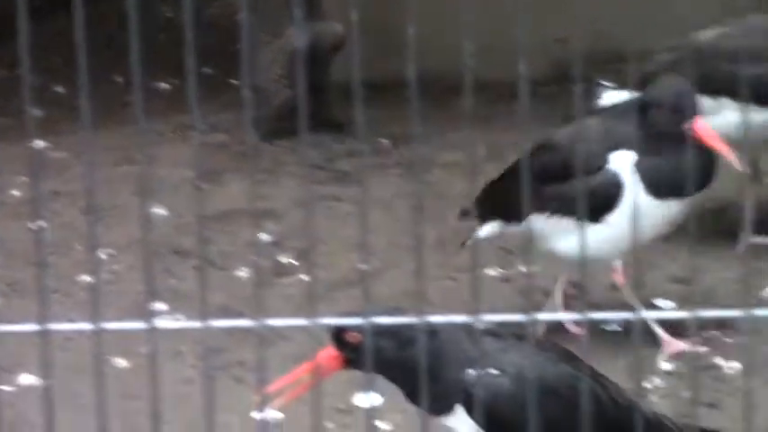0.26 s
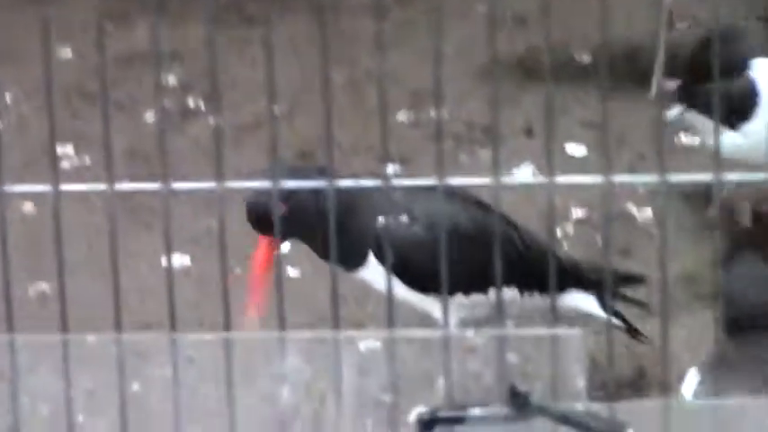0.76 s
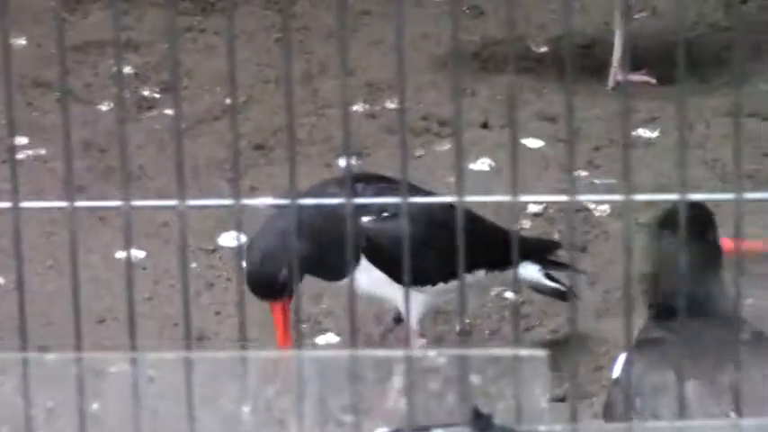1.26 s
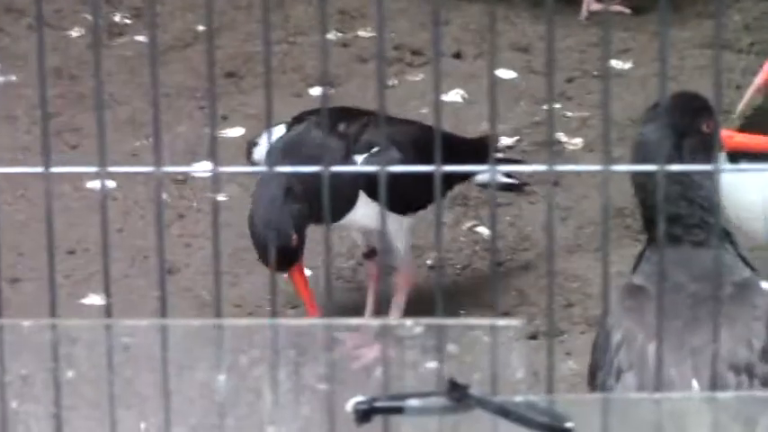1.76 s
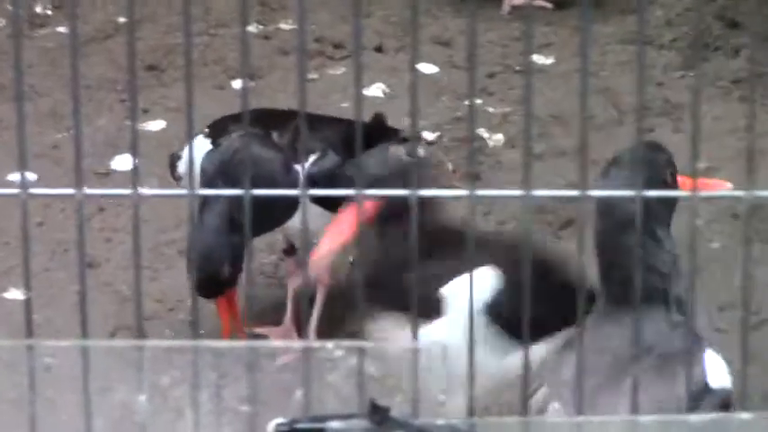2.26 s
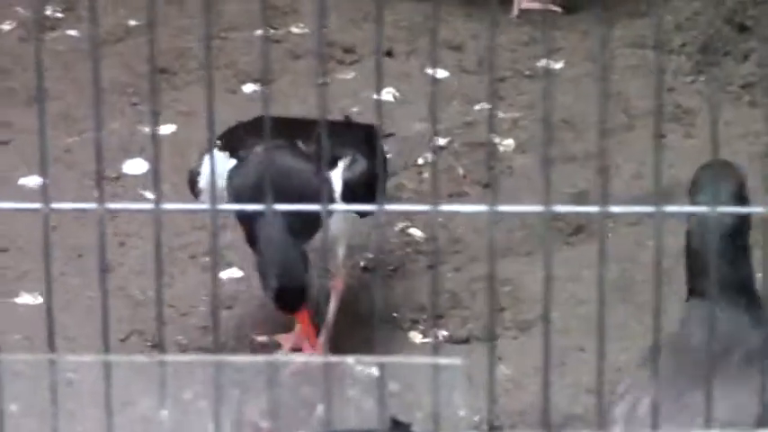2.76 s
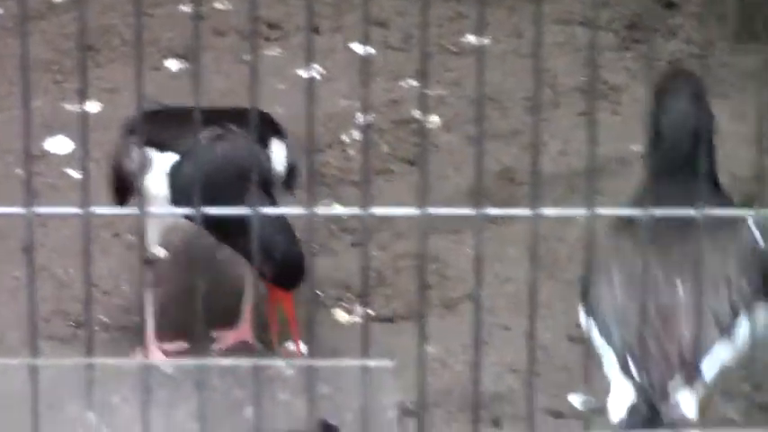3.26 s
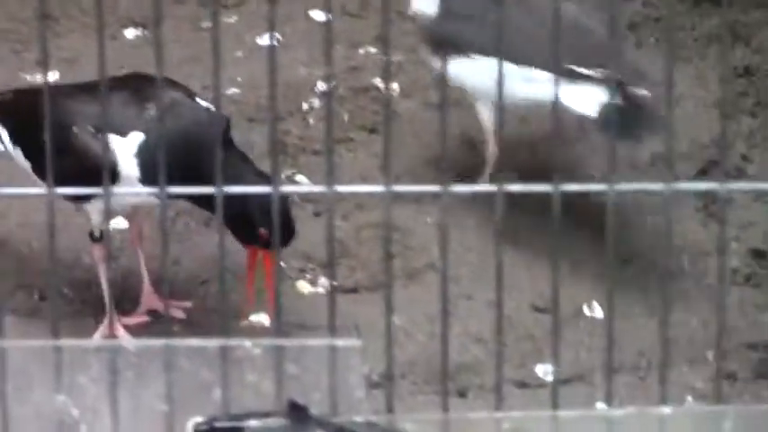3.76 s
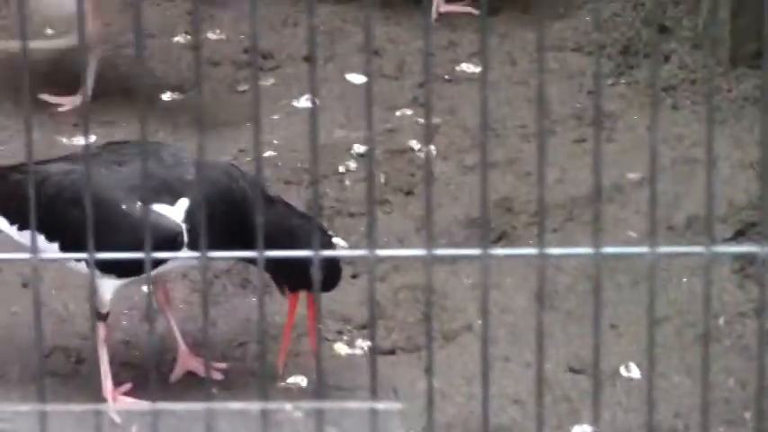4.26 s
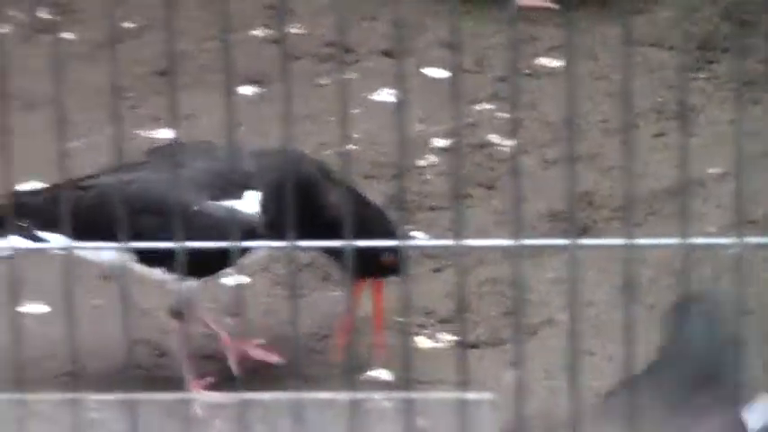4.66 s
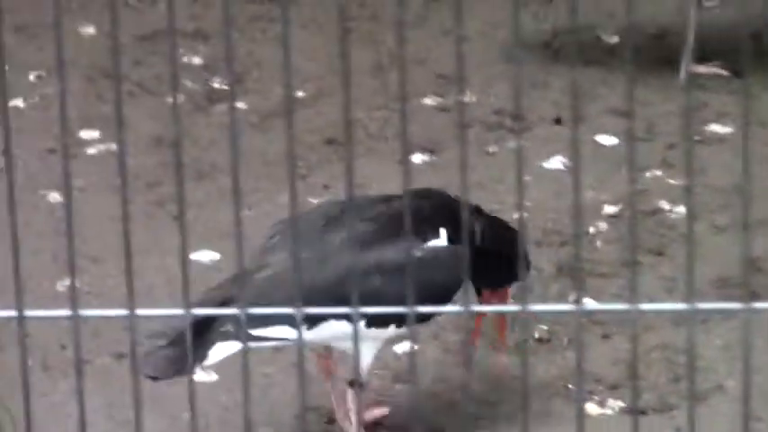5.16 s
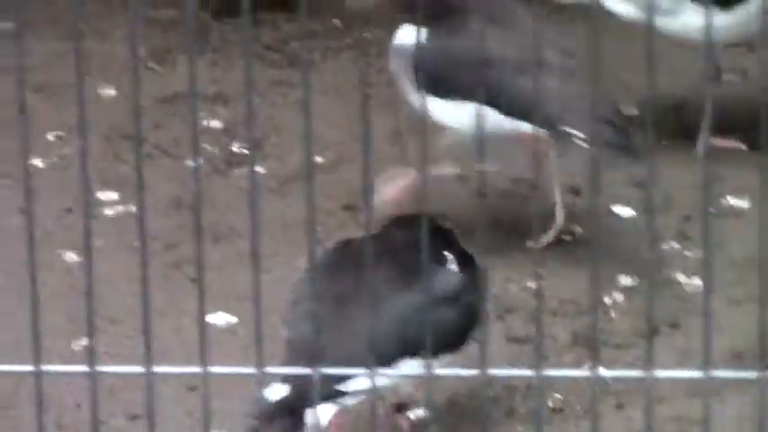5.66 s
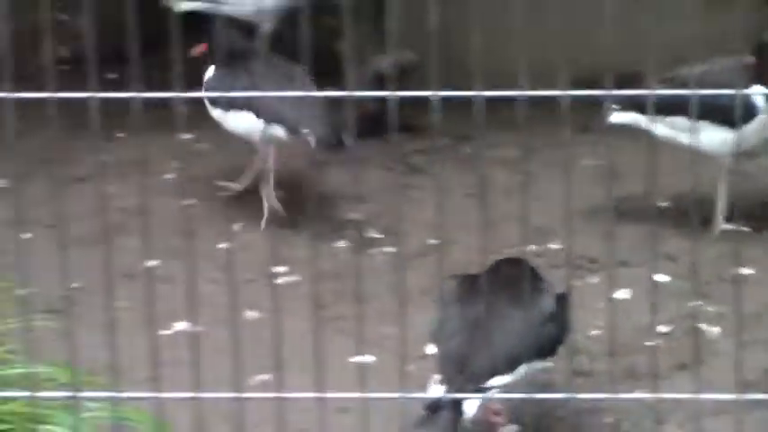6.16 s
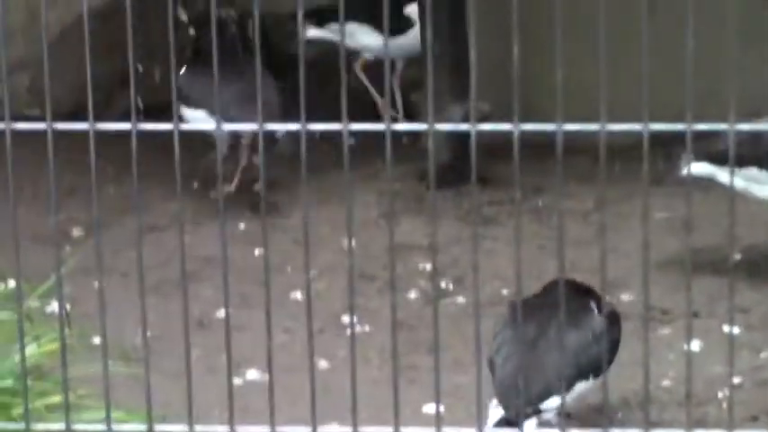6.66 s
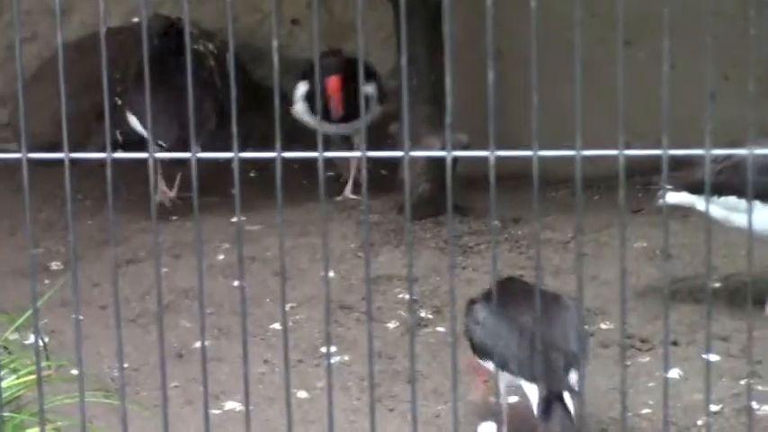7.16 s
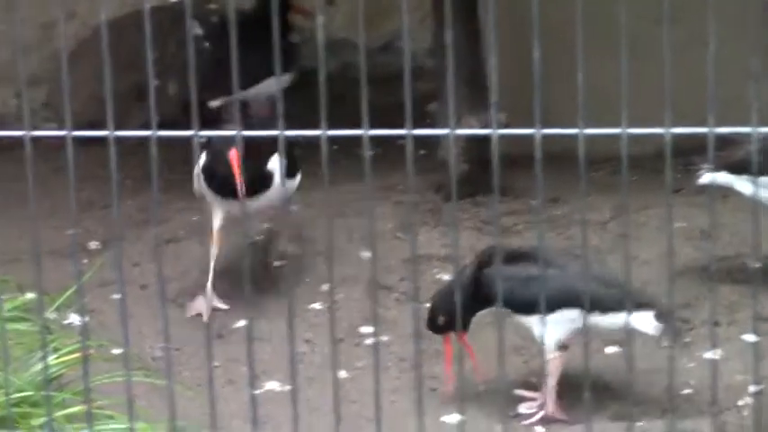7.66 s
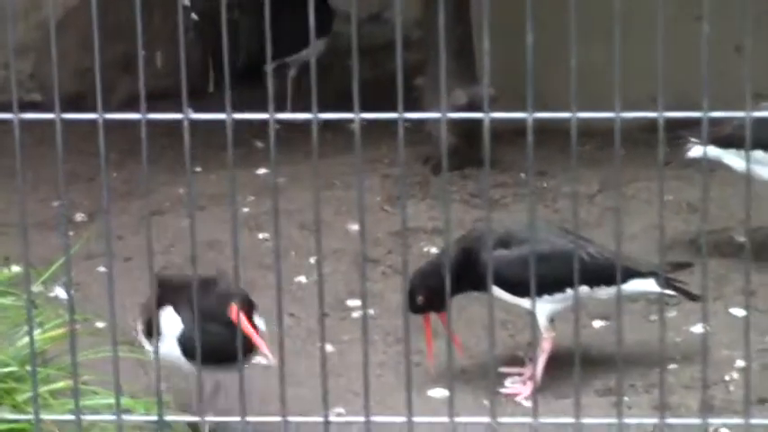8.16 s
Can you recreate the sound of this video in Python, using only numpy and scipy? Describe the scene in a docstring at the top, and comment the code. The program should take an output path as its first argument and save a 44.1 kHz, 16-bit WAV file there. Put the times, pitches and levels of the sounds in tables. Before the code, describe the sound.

A nearby oystercatcher alternates reedy whines with sharp kips while a second bird pipes faint answers from farther back. The near bird speeds into a quick trill, then pipes loud, shrill whistles and harsh screeches, ending in long falling notes. Air vents hum steadily underneath, with a few hard knocks and soft scuffs. The hard-walled indoor aviary adds a short echo.

```python
"""An indoor aviary with hard walls, where oystercatchers pipe over humming air vents and a few knocks.
The nearest bird swaps reedy whines with sharp kips, speeds into a trill, then pipes loud and shrill,
ending in long slurred notes. Another answers from the back. Each call is a gliding tone from the bird's
voice box, coloured by its throat and bill. A limiter turns the sound down under the loudest notes."""
import sys
import numpy as np
from scipy import signal
from scipy.fft import rfft, irfft, next_fast_len
from scipy.io import wavfile
from scipy.ndimage import uniform_filter1d, minimum_filter1d

SR = 44100
rng = np.random.default_rng(int(sys.argv[2]) if len(sys.argv) > 2 else 0)


def dump_mix(stems):
    """Bounce the given channels to the path in sys.argv[1] as a 16-bit WAV at rate SR."""
    frames = np.atleast_2d(stems).T  # one column per channel
    limited = np.clip(frames, -1, 1)  # hard clip at full scale
    pcm = np.round(limited * 32767).astype(np.int16)
    wavfile.write(sys.argv[1], SR, pcm)


N = 370881


def from_db(db):
    return 10 ** (np.asarray(db) / 20)


def unit_level(x):
    return x / np.sqrt(np.mean(x ** 2) + 1e-20)


def at_hz(points, hz):
    """Read between a table's rows, spacing octaves evenly."""
    f, value = np.transpose(points)
    return np.interp(np.log(np.maximum(hz, 1)), np.log(f), value)


def add(track, start_s, sound):
    i = max(round(start_s * SR), 0)
    track[i:i + len(sound)] += sound[:max(N - i, 0)]


def flutter(size, rate_hz):
    """Random wavering, up to about this rate."""
    lowpass = signal.butter(2, rate_hz, fs=SR, output="sos")
    return unit_level(signal.sosfilt(lowpass, rng.standard_normal(SR // 3)))[-size:]


def band_noise(size, low_hz, high_hz):
    band = signal.butter(2, [low_hz, high_hz], "band", fs=SR, output="sos")
    return unit_level(signal.sosfilt(band, rng.standard_normal(size)))


def stereo(mid, side, side_db):
    """Two microphones close together hear almost the same sound."""
    return mid + from_db(side_db) * side * np.array([[1], [-1]])


def pitch_curve(length_s, hz, scoop, rise_s, drop, fall_s, sag=0):
    """A note scoops up, sags while held and drops at the end, each by a share of its pitch."""
    t = np.arange(int(length_s * SR)) / SR
    ending = np.clip(1 - (length_s - t) / fall_s, 0, 1) ** 2
    return hz * (1 - scoop * np.exp(-t / rise_s)) * (1 - sag * (t / length_s - .5)) * (1 - drop * ending)


def bird_note(glide, harmonics_db, colour, jitter, attack_s, release_s, swell_db=0, rough=0, end_db=None):
    """The voice box makes harmonics (multiples of the pitch); throat and bill make some louder."""
    size = len(glide)
    t, progress = np.arange(size) / SR, np.linspace(0, 1, size)
    below_pitch = 1 - glide / glide[size // 2]
    # a rough note shakes at both ends and, if long enough, calms to a pure whistle in between
    calm = np.exp(-((progress - .52) / .15) ** 2) * min(t[-1] / .1, 1) ** 2
    shake_hz = 371.6 * (1 + .311 * flutter(size, rate_hz=206))
    shake = np.sin(2 * np.pi * np.cumsum(shake_hz) / SR)
    # any note trembles more while it scoops or drops
    tremble = (jitter + .09 * np.minimum(np.abs(below_pitch), .2)) * flutter(size, rate_hz=277)
    hz = glide * (1 + tremble + rough * (1 - calm) * (.041 + .13 * shake))
    harmonic = np.arange(1, len(harmonics_db) + 1)[:, None]
    db = np.array(harmonics_db, float)[:, None] + rough * calm * np.where(harmonic > 1, -14, 6)
    if end_db is not None:
        # as the tension lets go, the pitch drops and the tone turns reedy
        slack = np.clip(below_pitch / .12, 0, 1) * (progress > .5)
        db = db + slack * (np.array(end_db)[:, None] - db)
    db = db + at_hz(colour, harmonic * glide) + swell_db * (progress - .5)
    gains = from_db(db) * (harmonic * glide < SR / 2)
    fade = np.clip(t / attack_s, 0, 1) * np.clip((t[-1] - t) / release_s, 0, 1)
    phase = 2 * np.pi * np.cumsum(hz) / SR
    return np.sqrt(2) * fade * np.sum(gains * np.sin(harmonic * phase), axis=0)


# The tone of the moving air: frequency_hz, gain_db
VENT_COLOUR = [(25, -28), (45, -17), (80, -7.5), (150, -0.5), (280, -1.5), (500, -5), (900, -9),
               (1500, -14.5), (3000, -12), (6000, -23), (10000, -40.5), (13000, -49), (16000, -76)]


def ventilation(level_db):
    """Steady, dull air noise fills the hall."""
    size = next_fast_len(N)
    colour = from_db(at_hz(VENT_COLOUR, np.arange(size // 2 + 1) * SR / size))
    white = rfft(rng.standard_normal((2, size)))
    mid, side = unit_level(irfft(white * colour, size)[:, :N])
    return from_db(level_db) * stereo(mid, side, side_db=-25)


# How loud the rumble is: time_s, level_db
RUMBLE_LEVELS = [(0, -79), (4, -70), (4.8, -66), (8.41, -50)]


def rumble():
    """A deep rumble starts very faint and grows late on."""
    mid, side = (band_noise(N, low_hz=20, high_hz=74) for _ in range(2))
    level_db = np.interp(np.arange(N) / SR, *np.transpose(RUMBLE_LEVELS))
    return from_db(level_db) * stereo(mid, side, side_db=-23)


# How reedy the low voice is: time_s, third_harmonic_db
REEDINESS = [(0, -8), (.8, -3.5), (1.4, 2), (3.2, 0)]
# How throat and bill colour a whine: frequency_hz, gain_db
WHINE_COLOUR = [(1100, -3.5), (1350, -3.5), (1750, -0.5), (2200, -0.5), (2600, 2.5), (3700, 3),
                (4400, -8.5), (5000, -14), (6400, -21.5), (7700, -22.5), (9000, -23.5), (10500, -31),
                (15000, -59)]
# Whines, growing shorter and steeper: start_s, length_s, first_pitch_hz, top_pitch_hz, level_db
WHINES = [(0, 0.19, 1266, 1329, -30.5), (0.414, 0.16, 1108, 1260, -35.5), (0.777, 0.11, 1144, 1273, -34),
          (1.07, 0.12, 1127, 1265, -34), (1.384, 0.13, 1102, 1303, -36), (1.692, 0.14, 1063, 1312, -36.5),
          (2.008, 0.16, 1131, 1433, -32.5), (2.349, 0.1, 1149, 1522, -30.5),
          (2.639, 0.1, 1171, 1574, -28.5), (2.921, 0.082, 1167, 1710, -27),
          (3.191, 0.068, 1210, 1835, -27.5), (3.441, 0.038, 1254, 1950, -28.5)]


def whines():
    """Low, reedy notes. More pressure makes one climb further, swell more and turn brighter."""
    out = np.zeros(N)
    for start, length, first_hz, top_hz, db in WHINES:
        octaves = np.log2(top_hz / first_hz)
        glide = pitch_curve(length, first_hz, scoop=.036, rise_s=.0082, drop=.245, fall_s=.0199)
        bend = .45 + 1.2 * octaves  # shallow whines level off, steep ones keep rising
        glide *= 2 ** (octaves * np.linspace(0, 1, len(glide)) ** bend)
        third_db = np.interp(start, *np.transpose(REEDINESS))
        upper_db = (13 * octaves - 3) * np.linspace(.3, 1, 8) - 1.5
        note = bird_note(glide, np.r_[-2.5, 0, third_db, upper_db], WHINE_COLOUR,
                         jitter=.006, attack_s=.008, release_s=.016, swell_db=24.8 * octaves)
        add(out, start, from_db(db) * note)
        if start > SIGHS_FROM_S:
            add(out, start + length + SIGH_GAP_S, sigh(level_db=-32.5))
    return out


# Dull scuffs: start_s, length_s, centre_hz, level_db
SCUFFS = [(0.027, 0.16, 168, -47.5), (.856, 0.045, 312, -36), (3.076, 0.25, 370, -41.5),
          (7.782, 0.043, 205, -36.5)]


def scuffs():
    """Brief, soft rubs: low noise that fades in and out."""
    out = np.zeros(N)
    for start, length, hz, db in SCUFFS:
        size = int(length * SR)
        add(out, start, from_db(db) * np.hanning(size) * band_noise(size, hz / 2.7, hz * 2.13))
    return out


# How throat and bill colour a kip: frequency_hz, gain_db
KIP_COLOUR = [(1200, -0.5), (1900, 5.5), (3000, 3.5), (4200, -4.5), (5000, -10), (6500, -21.5),
              (8500, -18.5), (11000, -25), (15000, -69)]
# Sharp kips: start_s, pitch_hz, level_db
KIPS = [(.309, 2152, -27), (0.664, 2040, -32), (.969, 1963, -32), (1.28, 2050, -32), (1.602, 2060, -33.5),
        (1.914, 1960, -33.5), (2.248, 1617, -35.5), (2.541, 1857, -33), (2.827, 1780, -33.5),
        (3.102, 1840, -33), (3.35, 1826, -32), (3.596, 1713, -34), (3.653, 1720, -37.5), (3.866, 1694, -40),
        (5.762, 2070, -40.5), (6.14, 2000, -43), (6.479, 2005, -48), (6.84, 2125, -38.5)]


def kips():
    """Short upward flicks of the low voice, rich in harmonics."""
    out = np.zeros(N)
    for start, hz, db in KIPS:
        second_db = 4.4 + .68 * np.interp(start, *np.transpose(REEDINESS))
        glide = pitch_curve(.031, hz, scoop=.51, rise_s=.0065, drop=.34, fall_s=.0029)
        note = bird_note(glide, np.r_[0, second_db, np.zeros(5)], KIP_COLOUR,
                         jitter=.025, attack_s=.0032, release_s=.0064, swell_db=.5)
        add(out, start, from_db(db) * note)
    return out


# How throat and bill colour either bird's piping: frequency_hz, gain_db
PIPE_COLOUR = [(1800, -47), (2400, -2.5), (2900, 8), (3550, 1.5), (3900, -62), (4400, -5.5), (5400, 6.5),
               (7200, 3.5), (8200, 5), (9400, -11), (10700, 1.5), (12300, -5.5), (14300, -1), (16000, -7)]
# The far bird's answers: start_s, length_s, pitch_hz, level_db
ANSWERS = [(.353, .055, 2465, -35), (0.709, 0.051, 3340, -42), (.933, 0.069, 3535, -36.5),
           (1.174, 0.13, 3507, -37), (1.443, 0.13, 3480, -38.5), (1.678, .15, 3490, -39),
           (1.94, 0.078, 3460, -36), (2.181, 0.098, 3490, -37.5), (2.497, 0.054, 3340, -38.5)]


def far_bird():
    """A second bird pipes notes that rise and fall."""
    out = np.zeros(N)
    for start, length, hz, db in ANSWERS:
        glide = pitch_curve(length, hz, scoop=.0565, rise_s=.008, drop=.048, fall_s=.0234)
        note = bird_note(glide, [-2, -9.5, -30, -35], PIPE_COLOUR,
                         jitter=.0069, attack_s=.0019, release_s=.0026)
        add(out, start, from_db(db) * note)
    return out


# The tones in a knock: pitch_hz, gain_db, ring_s (time to fade by 60 dB)
KNOCK_TONES = [(426, -41, 0.024), (905, -15, 0.01), (1420, -13, 0.014), (1840, -10, 0.021),
               (2800, 1.5, 0.0045), (4150, -17, 0.0047)]
# Knocks: start_s, level_db
KNOCKS = [(0.878, -14), (5.613, -13), (5.667, 2)]


def knocks():
    """Hard taps on something that barely rings."""
    out, t = np.zeros(N), np.arange(SR // 10) / SR
    tap = sum((-1) ** k * from_db(db - 60 * t / ring_s) * np.sin(2 * np.pi * hz * t)
              for k, (hz, db, ring_s) in enumerate(KNOCK_TONES)) / 2
    for start, db in KNOCKS:
        add(out, start, from_db(db) * tap)
    return out


SIGHS_FROM_S, SIGH_GAP_S = 2.0, .014


def sigh(level_db):
    """Once worked up, the bird follows long calls with a soft note, its lowest harmonic almost gone."""
    glide = pitch_curve(.068, hz=1050, scoop=.102, rise_s=.01013, drop=.162, fall_s=.035)
    return from_db(level_db) * bird_note(glide, [-62, -5, -12, -5.5, 4.5, -7, 2.5, 6], WHINE_COLOUR,
                                         jitter=.012, attack_s=.016, release_s=.018)


def lead_in(level_db):
    """A loud note starts low and flicks upward before the voice breaks."""
    glide = pitch_curve(.018, hz=1888, scoop=.248, rise_s=.0073, drop=0, fall_s=.005)
    return from_db(level_db) * bird_note(glide, [-5.5, -4.5, -13, -21], KIP_COLOUR,
                                         jitter=.082, attack_s=.0019, release_s=.0026)


# How throat and bill colour the trill: frequency_hz, gain_db
TRILL_COLOUR = [(2200, -9), (2600, 7), (4900, -8), (5400, 0), (7000, -3), (7900, -0.5), (10000, -29),
                (12700, -30), (15500, -43)]
# The trill's notes: start_s, length_s, pitch_hz, level_db
TRILL = [(3.483, 0.014, 2353, -15), (3.721, 0.0054, 2470, -19), (3.772, 0.0054, 2510, -15.5),
         (3.824, 0.0092, 2510, -19), (3.93, 0.01, 2533, -17), (3.986, 0.0071, 2508, -17.5),
         (4.036, 0.015, 2534, -17), (4.09, 0.019, 2548, -20.5), (4.144, 0.024, 2497, -17.5),
         (4.204, 0.021, 2600, -21), (4.265, 0.013, 2641, -14), (4.331, 0.017, 2430, -16)]


def trill():
    """A quick run of tiny notes; the longer ones are brighter."""
    out = np.zeros(N)
    for start, length, hz, db in TRILL:
        third_db = -6 + 3 * np.log2(length / .012)
        add(out, start - .011, lead_in(level_db=-29))
        glide = pitch_curve(length, hz, scoop=.06, rise_s=.0028, drop=.086, fall_s=.0055)
        note = bird_note(glide, [0, -1, third_db, 0, -2, -4], TRILL_COLOUR,
                         jitter=.017, attack_s=.0015, release_s=.0048)
        add(out, start, from_db(db) * note)
    return out


def piping(notes, shape, third_base_db, end_first_db, reed_db, lead_db, jitter, attack_s, sigh_db=None):
    """Full-voiced calls: a lead-in, a note that turns reedy as it ends, and perhaps a sigh."""
    out = np.zeros(N)
    end_db = np.r_[end_first_db, reed_db - np.array([0, 7, 15, 19])]  # harmonics as the note ends
    for start, length, hz, db, second_db, rough in notes:
        third_db = third_base_db + .64 * second_db
        harmonics_db = [0, second_db, third_db, third_db - 11, third_db - 19]
        add(out, start - .007, lead_in(lead_db))
        note = bird_note(pitch_curve(length, hz, **shape), harmonics_db, PIPE_COLOUR,
                         jitter, attack_s, release_s=.004, rough=rough, end_db=end_db)
        add(out, start, from_db(db) * note)
        if sigh_db is not None:
            add(out, start + length + SIGH_GAP_S, sigh(sigh_db))
    return out


# Screeches: start_s, length_s, pitch_hz, level_db, second_harmonic_db, roughness (0 to 1)
SCREECHES = [(4.449, 0.057, 3023, -19, -25, 0.14), (5.059, .105, 3068, -17.5, -16, 0.48),
             (5.424, .1, 3071, -22, -13, 0.34), (6.509, 0.097, 3045, -18, -8.5, 0.6),
             (7.073, 0.035, 2994, -17.5, -8, 0.43), (7.371, 0.049, 2965, -19, -7.5, 0.66)]


def screeches():
    """Harsh notes whose pitch shakes fast."""
    shape = dict(scoop=.094, rise_s=.0026, drop=.298, fall_s=.0259)
    return piping(SCREECHES, shape, third_base_db=-7, end_first_db=1.5, reed_db=-3.5,
                  lead_db=-51, jitter=.0032, attack_s=.0015, sigh_db=-43.5)


# Pips: start_s, length_s, pitch_hz, level_db, second_harmonic_db, roughness (0 to 1)
PIPS = [(4.635, 0.037, 2720, -15, -5, .02), (4.945, 0.041, 2847, -14.5, -8, 0.06),
        (5.302, 0.045, 2924, -15.5, -11, 0), (5.659, 0.046, 2957, -13, -14, 0.02),
        (6.035, 0.032, 3083, -12.5, -8, 0.08), (6.381, 0.047, 3000, -16, -8, 0.18),
        (6.737, .043, 2882, -14, -12.5, 0.24)]


def pips():
    """A short rise and fall opens each pair of loud notes."""
    shape = dict(scoop=.159, rise_s=.00765, drop=.255, fall_s=.02276)
    return piping(PIPS, shape, third_base_db=-8, end_first_db=.5, reed_db=-7,
                  lead_db=-32, jitter=.0084, attack_s=.0012)


# Peeps: start_s, length_s, pitch_hz, level_db, second_harmonic_db, roughness (0 to 1)
PEEPS = [(4.746, .071, 3530, -8.5, -6, 0.01), (5.787, 0.099, 3576, -7, -5, 0),
         (6.157, 0.088, 3600, -5, -9, 0.1), (6.861, 0.076, 3521, -8.5, -4, 0.01),
         (7.197, 0.049, 3555, -7, -6, 0.01), (7.486, 0.043, 3560, -10.5, -8.5, 0.03)]


def peeps():
    """High, pure whistles."""
    shape = dict(scoop=.205, rise_s=.00436, sag=.0279, drop=.35, fall_s=.024)
    return piping(PEEPS, shape, third_base_db=-13.5, end_first_db=-8, reed_db=-15,
                  lead_db=-64, jitter=.0041, attack_s=.0086, sigh_db=-38.5)


# Slurs: start_s, length_s, pitch_hz, level_db, second_harmonic_db, roughness (0 to 1)
SLURS = [(7.613, 0.13, 2967, -14, -7.5, 0.35), (7.841, 0.14, 2867, -15.5, -5.5, 0.07),
         (8.082, .15, 2826, -15, -6.5, 0.01), (8.323, 0.18, 2770, -13, -7, 0)]


def slurs():
    """Long, sinking notes end the run."""
    shape = dict(scoop=.21, rise_s=.012, sag=.1337, drop=.091, fall_s=.0546)
    return piping(SLURS, shape, third_base_db=-6.5, end_first_db=-6, reed_db=-11,
                  lead_db=-29.5, jitter=.0025, attack_s=.0052, sigh_db=-29)


# Bounces off the floor and walls: delay_s, gain (share of the direct sound)
ECHOES = [(.0031, 0.3), (0.009, 0.07), (0.0233, .3), (.029, 0.1)]
# How long the room rings: frequency_hz, ring_s (time to fade by 60 dB)
ROOM_RING = [(500, 0.68), (1500, 0.34), (3000, 0.46), (7000, 0.35), (11000, 0.3), (16000, 0.21)]


def aviary(sound, direct_db, tail_db):
    """The room adds quick echoes and a ringing tail whose highest notes die first."""
    t = np.arange(SR) / SR
    hz, white = np.arange(SR // 2 + 1), rfft(rng.standard_normal((2, SR)))
    edges_hz = np.r_[0, np.geomspace(700, SR / 2, 12)]
    tail = np.zeros((2, SR))
    for low, high in zip(edges_hz, edges_hz[1:]):
        ring_s = at_hz(ROOM_RING, (low + high) / 2)
        tail += irfft(white * (hz >= low) * (hz < high)) * from_db(-60 * t / ring_s)
    tail *= np.clip(t / .0055, 0, 1) * (1 + .5 * np.exp(-t / .025))  # early scatter off bars and walls
    mid, side = from_db(tail_db) * unit_level(tail) / np.sqrt(SR)
    mid[0] += from_db(direct_db)
    for delay, gain in ECHOES:
        mid[round(delay * SR)] += gain * from_db(direct_db)
    return signal.fftconvolve(sound[None], stereo(mid, side, side_db=-17.5), axes=1)[:, :N]


def scene():
    """Near and far sounds share the room; the left side is a touch louder."""
    near_bird = whines() + kips() + trill() + pips() + peeps() + screeches() + slurs()
    near = aviary(near_bird + knocks() + scuffs(), direct_db=1, tail_db=1)
    far = aviary(far_bird(), direct_db=-9, tail_db=6.5)
    return (near + far + rumble() + ventilation(level_db=-37.5)) * from_db([[.2], [-.2]])


def limiter(x, ceiling_db, release_db_per_s):
    """The volume drops at once on a peak and climbs back steadily."""
    over_db = np.maximum(20 * np.log10(np.abs(x).max(axis=0) + 1e-9) - ceiling_db, 0)
    recovery_db = release_db_per_s * np.arange(N) / SR
    cut_db = np.maximum.accumulate(over_db + recovery_db) - recovery_db
    return x * from_db(uniform_filter1d(minimum_filter1d(-cut_db, size=65), size=65))


def record(dry):
    """Hold down the peaks, then cut the treble above 15900 Hz."""
    held = limiter(dry, ceiling_db=-.79, release_db_per_s=153)
    return signal.sosfilt(signal.ellip(10, .1, 80, 15900, fs=SR, output="sos"), held)


dry = scene()
out = record(dry)
dump_mix(out)
```